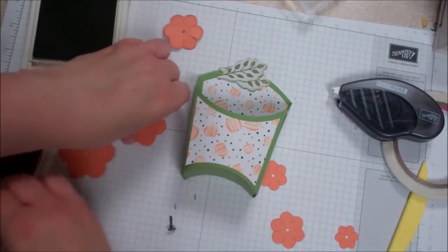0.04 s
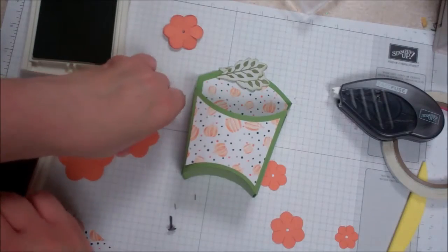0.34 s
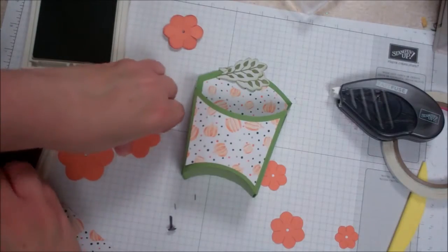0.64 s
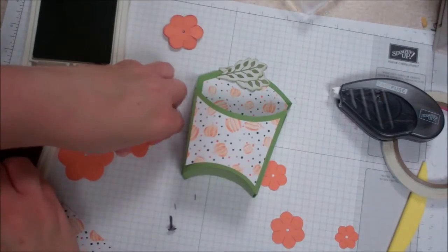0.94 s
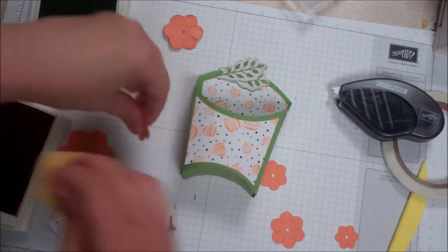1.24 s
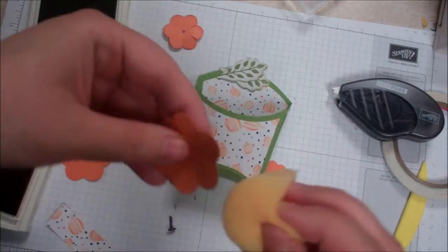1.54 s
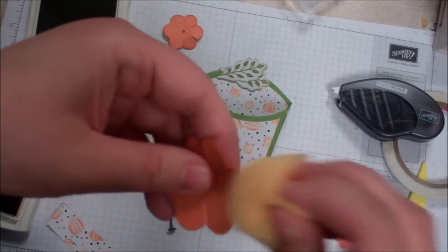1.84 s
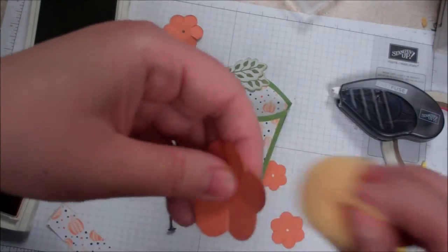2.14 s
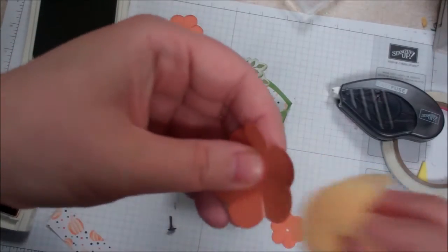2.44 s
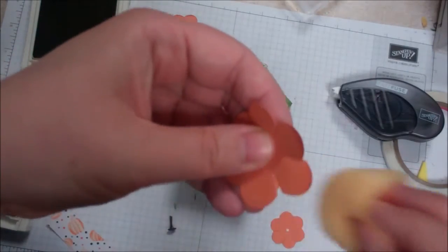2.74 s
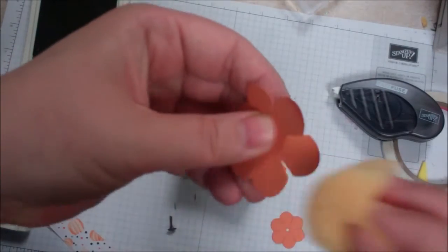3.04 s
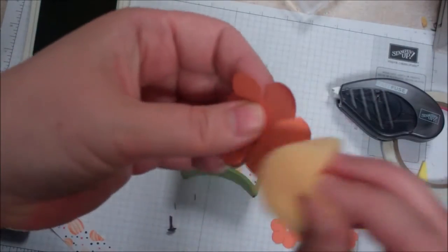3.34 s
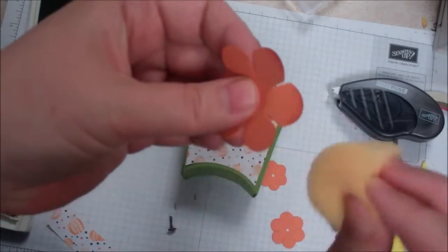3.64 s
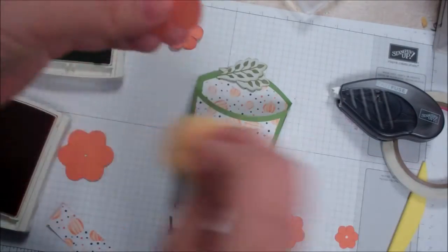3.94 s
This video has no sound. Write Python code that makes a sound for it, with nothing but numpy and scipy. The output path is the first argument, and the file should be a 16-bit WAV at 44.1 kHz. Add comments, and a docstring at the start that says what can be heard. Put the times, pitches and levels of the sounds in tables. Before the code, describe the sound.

A sponge dabs a paper flower in quick, regular strokes after soft handling on a table.

```python
"""At a craft table in a small, dry room, a hand slides over the top, bumps it and picks up a paper flower.
Then a sponge brushes the petals, five strokes a second, often grazing the paper on its way in.
Each stroke is stick-slip friction: a dense run of tiny slips, filtered by the resonances of the paper,
that ends as the petal springs free. A close stereo microphone hears it over faint hum and hiss."""
import sys
import numpy as np
from scipy import signal
from scipy.fft import rfft, irfft
from scipy.io import wavfile
from scipy.ndimage import map_coordinates

SR = 44100
rng = np.random.default_rng(int(sys.argv[2]) if len(sys.argv) > 2 else 0)


def to_wav(sig):
    """Store sig (one row per channel, or 1-D mono) as 16-bit WAV at the path in sys.argv[1].

    Samples outside -1..1 are clipped; the rate is SR.
    """
    pcm = np.clip(np.atleast_2d(sig), -1, 1) * 32767
    pcm = np.round(pcm).astype(np.int16)
    wavfile.write(sys.argv[1], SR, pcm.T)  # frames by channels


N = 176400
T, HZ = np.arange(N) / SR, np.fft.rfftfreq(N, 1 / SR)
BAND_LIMIT_HZ = 14300

# sponge strokes (time [s], length [s], contact level [dB], release level [dB], midrange gain [dB],
# petal resonance [Hz], flap level [dB])
STROKES = [(1.757, 0.028, -40.5, -30, 4, 5800, -57), (1.953, 0.017, -36, -32, 0.5, 5800, -62),
           (2.159, 0.0085, -39, -28.5, 5, 6800, -64), (2.369, 0.011, -24, -32.5, 4.5, 3500, -49.5),
           (2.566, 0.036, -36.5, -27, 3, 3400, -55), (2.764, 0.046, -34.5, -42.5, 5.5, 5100, -53),
           (2.969, 0.047, -33.5, -42, 5, 4070, -58), (3.201, 0.0138, -42, -34, 4.5, 4000, -68),
           (3.408, 0.016, -32.5, -22, -6, 4220, -59), (3.631, 0.03, -27, -24.5, 0, 2970, -52),
           (3.836, 0.029, -35, -27, 2.5, 3850, -48)]
# spectrum of a brushed petal (frequency [Hz], relative level [dB])
PETAL = [(60, -40), (200, -35), (400, -16), (900, -5.5), (1900, -2), (2550, -2.5), (3200, 1), (5700, 2.5),
         (7200, -3), (8800, 2), (14000, 6)]
# spectrum of sliding paper (frequency [Hz], relative level [dB])
RUSTLE = [(100, -11.5), (500, -1), (2200, -2), (4800, -0.5), (7500, -2), (14000, 1)]


def sponge(attack_s=.0025, release_s=.0011, drag_db=-9, drag_s=.0038, brighten_db=4, fizz_hz=7000):
    """Stick-slip friction: the rub follows the pressure and brightens towards the petal's edge."""
    out = np.zeros((2, N))
    for start, length, contact_db, release_db, mid_db, petal_hz, _ in STROKES:
        t = T - start
        along, after = np.clip(t / length, 0, 1), np.maximum(t - length, 0)
        attack = .5 + .5 * np.tanh(.5 * t / attack_s)
        release = (1 - amp(drag_db)) * np.exp(-after / release_s) + amp(drag_db) * np.exp(-after / drag_s)
        pressure = attack * amp(contact_db + (release_db - contact_db) * along) * release
        rub = paper(PETAL, mid_db, resonance_db=4.5 * hump(petal_hz, octaves=.19))
        body = irfft(rfft(rub) / (1 + (HZ / fizz_hz) ** 2), N)
        tilt = amp(brighten_db * (along - .5))
        out += pressure * (body / tilt + (rub - body) * tilt)
    return out * uneven_grip()


def petal_flaps(lead_s=.00415):
    """Free vibration: the petal springs back as each stroke ends."""
    # petal modes (frequency [Hz], relative level [dB], t60 [s])
    modes = [(285, 1, 0.12), (377, 21, 0.043)]
    return ring(modes, [(start + length - lead_s, db) for start, length, *_, db in STROKES])


def petal_pops():
    """Resonance: a cupped petal pops hollowly when the sponge catches it."""
    # catches (time [s], level [dB])
    catches = [(2.37, -42.5), (2.77, -45.5), (3.838, -36)]
    return band(hz=1160, octaves=.78) * sum(amp(db) * burst(s, decay_s=.0069) for s, db in catches)


def grazes():
    """Light friction: sponge and fingers graze the flower with a bright hiss."""
    # touches (time [s], half width [s], level [dB])
    touches = [(1.345, 0.055, -51.5), (1.735, 0.0091, -46), (1.924, 0.0071, -48.5), (2.335, 0.0062, -47.5),
               (2.544, 0.0081, -39.5), (2.749, 0.0098, -37.5), (2.951, 0.0077, -48), (3.040, 0.02, -50.5),
               (3.098, 0.014, -50.5), (3.156, 0.017, -46), (3.306, 0.044, -45), (3.379, 0.011, -41),
               (3.775, 0.14, -54.5), (3.97, 0.048, -52.5)]
    # grazed paper (frequency [Hz], relative level [dB])
    spectrum = [(100, -47), (2000, -10.5), (3500, -0.5), (7200, 1.5), (14000, 8)]
    return paper(spectrum) * sum(amp(db) * swell(s, width) for s, width, db in touches)


def rustles():
    """Forced vibration: sliding on the table or under the fingers drives the flower's resonances."""
    # slides (time [s], half width [s], level [dB], midrange gain [dB])
    slides = [(0.887, 0.017, -46.5, 9), (0.947, 0.017, -40.5, 3), (1.135, 0.061, -51.5, -11),
              (1.189, 0.025, -45, -14), (1.475, 0.058, -54, -18), (1.487, 0.0043, -44, -5.5),
              (3.436, 0.013, -40, -3.5)]
    # flower resonances (frequency [Hz], width [octaves], gain [dB])
    resonances = [(3070, 0.33, 4.5), (5830, 0.13, 4.5)]
    flower_db = sum(db * hump(hz, octaves) for hz, octaves, db in resonances)
    return sum(amp(db) * swell(s, width) * paper(RUSTLE, mid_db, flower_db)
               for s, width, db, mid_db in slides)


def scrapes(ring_db=7.5):
    """Narrow resonance: fingertips scrape the flower along the table, its thin ring lower each time."""
    # pushes (time [s], half width [s], level [dB], midrange gain [dB], ring [Hz])
    pushes = [(0.712, 0.026, -44.5, -2.5, 4760), (0.768, 0.016, -48, 6.5, 4720),
              (0.817, 0.016, -45.5, 6.5, 4460)]
    return sum(amp(db) * swell(s, width) * paper(RUSTLE, mid_db, ring_db * hump(hz, octaves=.07))
               for s, width, db, mid_db, hz in pushes)


def snaps():
    """Sudden release of elastic energy: paper edges snap free."""
    # edges (time [s], level [dB], decay [s], midrange gain [dB])
    edges = [(.943, -30, 0.0078, -21), (1.0996, -33, 0.00067, 3), (1.3682, -35, 0.0014, 8.5),
             (3.8676, -15, 0.00079, 10), (3.932, -31, 0.0026, -7)]
    return sum(amp(db) * burst(s, decay) * paper(PETAL, mid_db) for s, db, decay, mid_db in edges)


def soft_contacts():
    """Soft friction: low rubs of the fingers, and a dull pat as the last sponge stroke ends."""
    # contacts (time [s], half width [s], level [dB], pitch [Hz])
    contacts = [(3.018, 0.017, -57.5, 235), (3.24, 0.069, -63, 300), (3.870, 0.0065, -45, 190)]
    return sum(amp(db) * swell(s, width) * band(hz, octaves=.51) for s, width, db, hz in contacts)


def hand_on_table(rub_db=-5.5, rough_db=1.5, rough_s=.0076, skin_db=-3, tick_db=-8):
    """Friction and impact: the hand drags over the table, and its bumps excite the table's modes."""
    # sliding hand (time [s], relative level [dB])
    slide = [(0, -55.5), (.10, -53), (.16, -46.5), (.25, -50.5), (.30, -46.5), (.36, -62), (.44, -56),
             (.50, -67), (.59, -53), (.68, -62)]
    # dull rub of the hand (frequency [Hz], relative level [dB])
    spectrum = [(60, -31), (180, -2.5), (430, 5), (800, -2.5), (1200, -10.5), (2500, -15), (14000, -18)]
    # bumps (time [s], clack level [dB], thud level [dB], pat level [dB])
    bumps = [(.128, -52, -56.5, -47.5), (0.298, -66, -61, -58), (.621, -59, -56.5, -45),
             (.891, -34, -45.5, -42.5), (.905, -43, -80, -50), (1.013, -62, -64, -49.5),
             (1.077, -52, -44.5, -50.5)]
    # table modes, high and low (frequency [Hz], relative level [dB], t60 [s])
    clack_modes = [(961, 11, 0.08), (1100, 11, 0.031), (1140, 5, 0.038), (1746, 6, 0.023),
                   (2300, 8.5, 0.026)]
    thud_modes = [(209.5, 13, 0.11)]
    clacks = [(s, db) for s, db, _, _ in bumps]
    thuds = [(s, db) for s, _, db, _ in bumps]
    pats = sum(amp(db) * burst(s, decay_s=.0096) for s, _, _, db in bumps)
    ticks = sum(amp(db + tick_db) * burst(s, decay_s=.0035) for s, db in clacks)
    drag = amp(np.interp(T, *np.transpose(slide), right=-120))
    rub = colour(slips(), curve(spectrum))
    dull = rub * (drag * amp(rub_db + rough_db * wander(N, rough_s * SR)) + pats)
    bright = paper(RUSTLE) * ticks + paper(RUSTLE) * drag * amp(skin_db)
    return dull + bright + ring(clack_modes, clacks) + ring(thud_modes, thuds)


def room(x, t60_s=.088, first_echo_s=.003):
    """Reverberation: sparse reflections die away exponentially."""
    t = np.arange(SR // 3) / SR
    echoes = rng.standard_normal((2, len(t))) * (rng.random((2, len(t))) < .08)
    echoes *= (t > first_echo_s) * amp(-60 * t / t60_s)
    echoes /= np.linalg.norm(echoes, axis=1, keepdims=True)
    return signal.fftconvolve(x, echoes, axes=1)[:, :N]


def background(noise_db=-56):
    """Stationary noise: hiss and room rumble, with the tones of a mains hum."""
    # noise floor (frequency [Hz], relative level [dB])
    spectrum = [(25, -1), (100, -5.5), (260, -1.5), (420, -2.5), (1200, -6.5), (8000, -7.5), (14000, -5.5)]
    # left-right likeness of the noise (frequency [Hz], correlation [0..1])
    likeness = [(30, 0.58), (400, 0.21), (2000, 0.039)]
    # mains hum (frequency [Hz], level [dB])
    hum = [(239.8, -70.5), (720, -77)]
    noise = colour(rng.standard_normal((2, N)), curve(spectrum), likeness)
    return amp(noise_db) * noise + sum(amp(db) * np.sqrt(2) * np.sin(2 * np.pi * hz * T) for hz, db in hum)


def slips(per_s=10000, spread_db=2):
    """Stick-slip motion: two dense trains of tiny clicks of uneven size."""
    size = amp(spread_db * np.minimum(rng.exponential(1, (2, N)), 4))
    return size * rng.choice([-1., 1.], (2, N)) * (rng.random((2, N)) < per_s / SR)


def uneven_grip(depth_db=1.53, step_s=.002):
    """Amplitude modulation: the level of the friction flickers."""
    return amp(depth_db * wander(N, step_s * SR))


def paper(spectrum, mid_db=0, resonance_db=0, bend_db=2.2, bend_hz=148.5):
    """Source and filter: friction through paper whose fine resonances differ with every bend."""
    ripple_db = bend_db * wander(len(HZ), bend_hz * N / SR)
    return colour(slips(), curve(spectrum) + mid_db * hump(hz=1080, octaves=1.5) + resonance_db + ripple_db)


def band(hz, octaves):
    """Friction filtered by one broad resonance."""
    return colour(slips(), 20 * np.log10(hump(hz, octaves) + 1e-6))


def ring(modes, hits, low_cut_hz=167):
    """Damped modes struck at (time [s], level [dB]); small surfaces radiate no deep bass."""
    t, out = np.arange(SR // 3) / SR, np.zeros(N)
    tone = sum(amp(db - 60 * t / t60) * np.sin(2 * np.pi * hz * t) for hz, db, t60 in modes)
    tone /= np.sqrt(np.mean(tone[:SR // 100] ** 2))  # rms 1 over the first 10 ms
    for s, db in hits:
        part = out[round(s * SR):][:len(tone)]
        part += amp(db) * tone[:len(part)]
    return signal.sosfilt(signal.butter(4, low_cut_hz, "high", fs=SR, output="sos"), out)


def colour(pair, db, likeness=None):
    """Partial coherence: two independent signals are mixed and given one spectrum, at rms 1."""
    # left-right likeness of a close source (frequency [Hz], correlation [0..1])
    near_likeness = [(1500, 1), (12000, 0.55)]
    correlation = curve(likeness or near_likeness)
    left, other = rfft(pair)
    right = correlation * left + np.sqrt(1 - correlation ** 2) * other
    return unit(irfft(np.array([left, right]) * amp(db) * (HZ < BAND_LIMIT_HZ), N))


def swell(centre, width):
    """A Gaussian rise and fall."""
    return np.exp(-((T - centre) / width) ** 2)


def burst(start, decay_s, rise_s=.00033):
    """A linear rise and an exponential decay."""
    return np.clip((T - start) / rise_s + 1, 0, 1) * np.exp(-np.maximum(T - start, 0) / decay_s)


def hump(hz, octaves):
    """A bell over log frequency."""
    return np.exp(-(np.log2((HZ + 1) / hz) / octaves) ** 2)


def curve(points):
    """A table interpolated over log frequency."""
    hz, value = np.transpose(points)
    return np.interp(np.log(HZ + 1), np.log(hz + 1), value)


def wander(count, step):
    """Random drift to a new value every step points."""
    return unit(map_coordinates(rng.standard_normal(8000), [np.arange(count) / step], order=1, mode="wrap"))


def amp(db):
    """Decibels to gain."""
    return 10 ** (np.asarray(db) / 20)


def unit(x):
    """Scales to rms 1."""
    return x / np.sqrt(np.mean(x ** 2) + 1e-20)


def scene(left_lag_s=9e-6, pan_db=.4, room_db=-13.5):
    """Superposition: the sources add, set just off centre by time and level differences."""
    brushing = sponge() + petal_flaps() + petal_pops()
    handling = (grazes() + rustles() + scrapes()) * uneven_grip() + snaps() + soft_contacts()
    left, right = brushing + handling + hand_on_table()
    left = irfft(rfft(left) * np.exp(-2j * np.pi * HZ * left_lag_s), N)
    near = np.array([left * amp(pan_db), right * amp(-pan_db)])
    return near + amp(room_db) * room(near) + background()


def record(dry):
    """Band limiting: a steep low-pass removes the highest treble."""
    low_pass = signal.firwin(601, BAND_LIMIT_HZ, window=("kaiser", 8), fs=SR)
    return signal.oaconvolve(dry, low_pass[None], "same")


dry = scene()
out = record(dry)
to_wav(out)
```